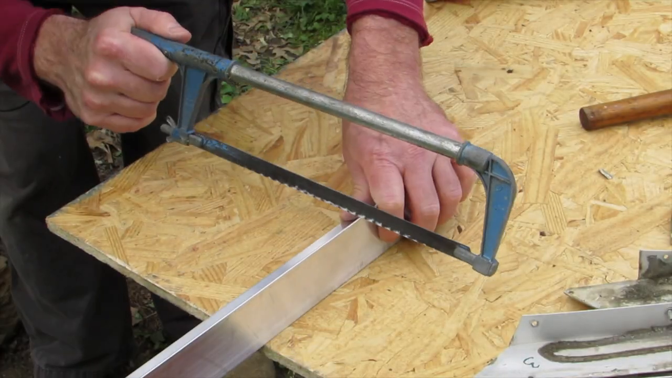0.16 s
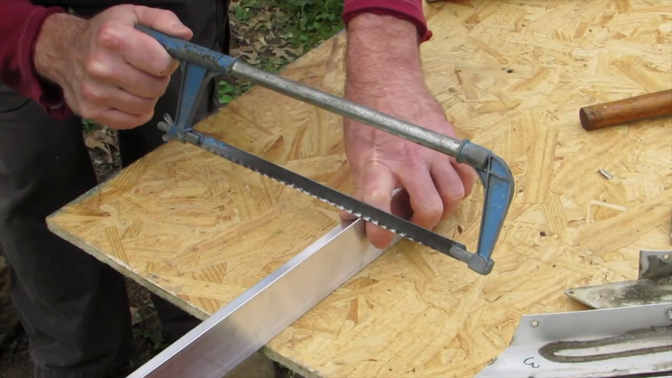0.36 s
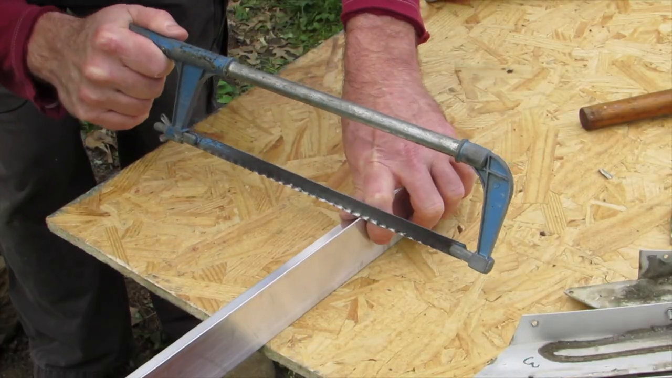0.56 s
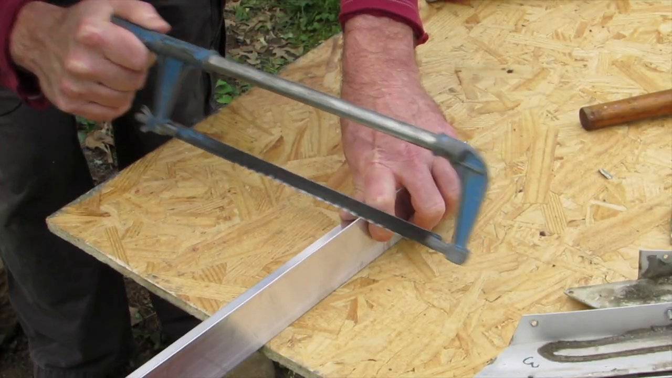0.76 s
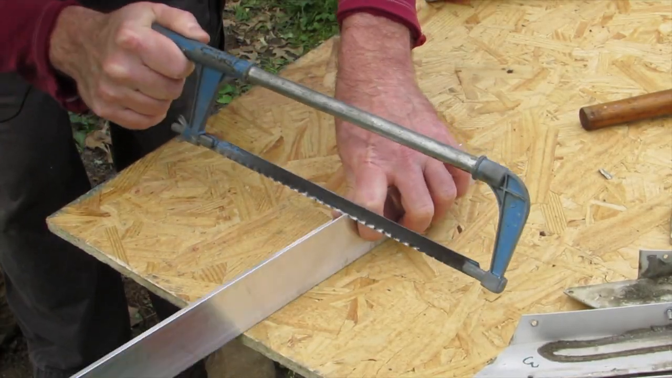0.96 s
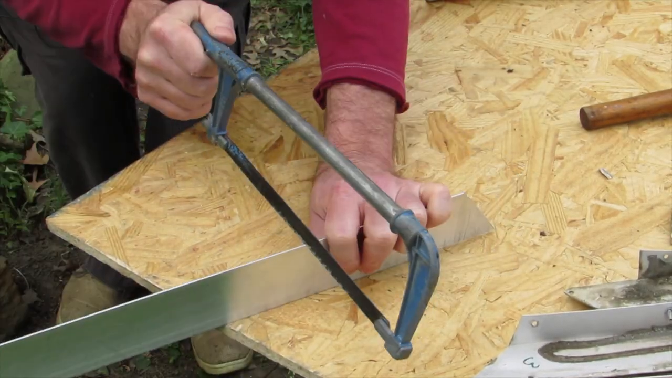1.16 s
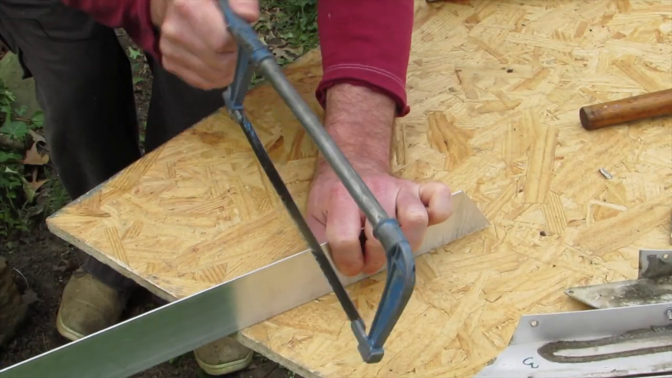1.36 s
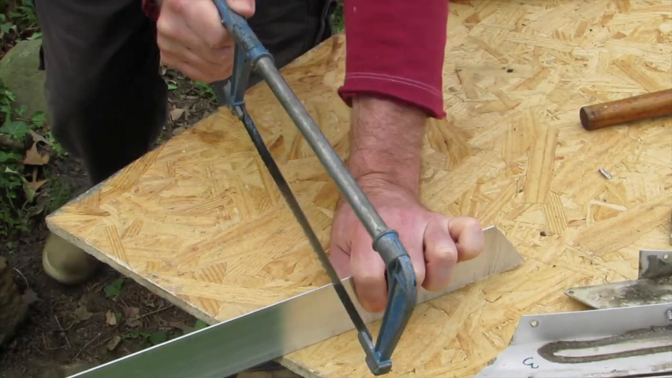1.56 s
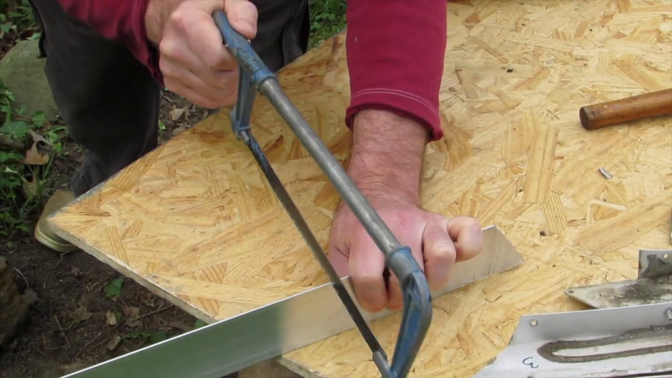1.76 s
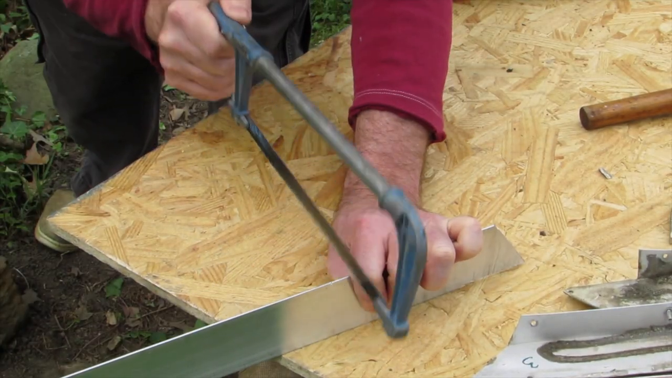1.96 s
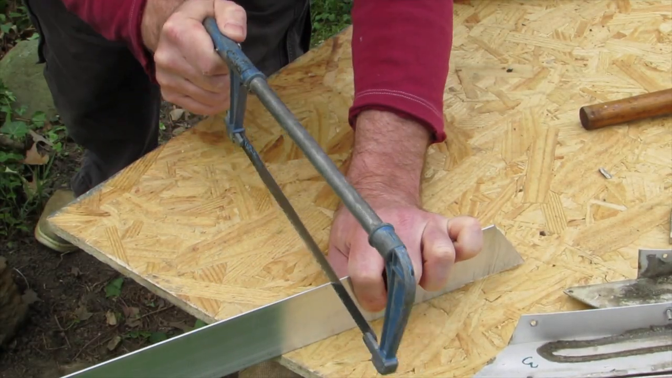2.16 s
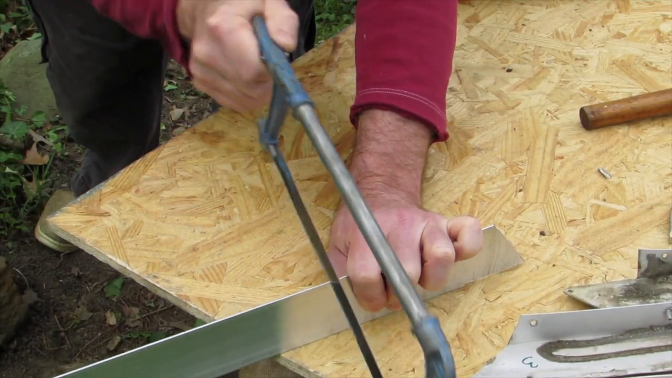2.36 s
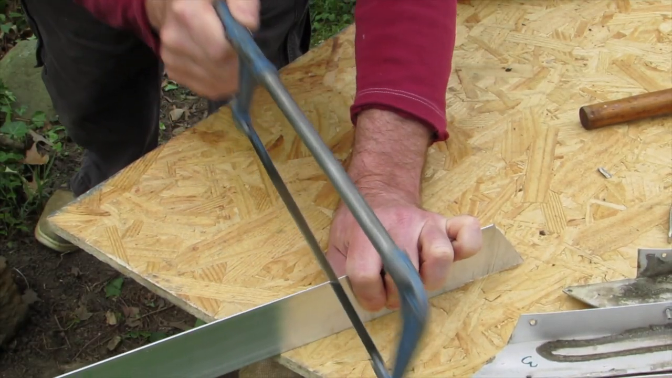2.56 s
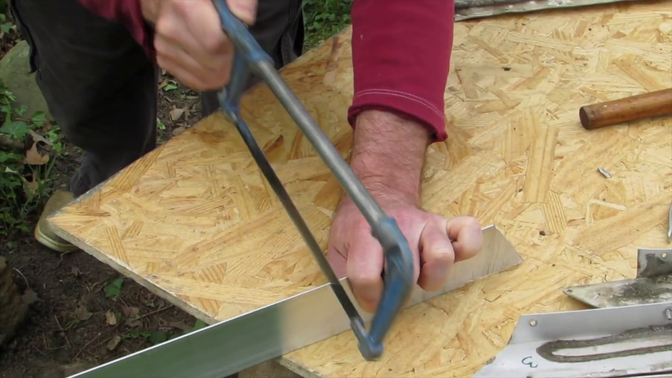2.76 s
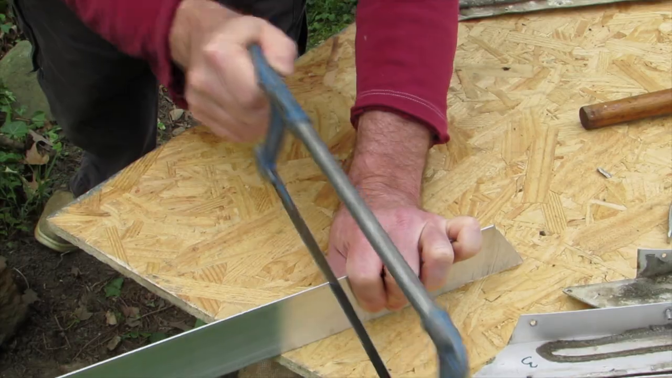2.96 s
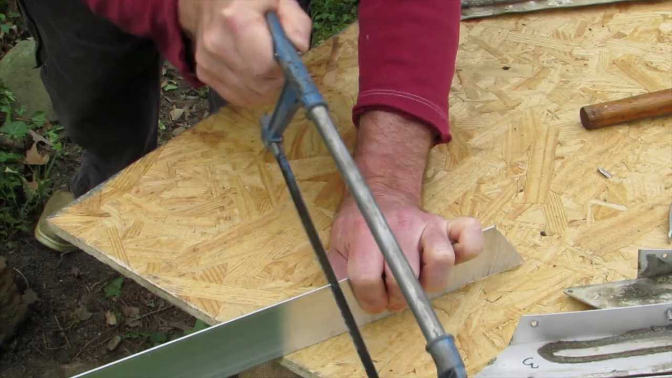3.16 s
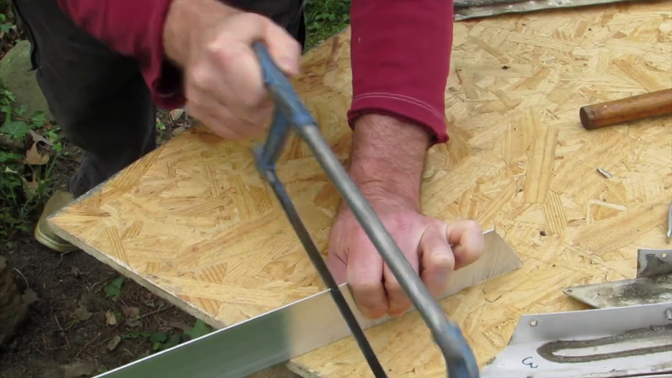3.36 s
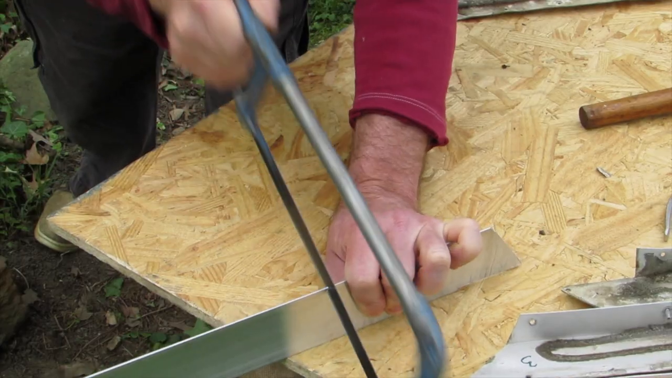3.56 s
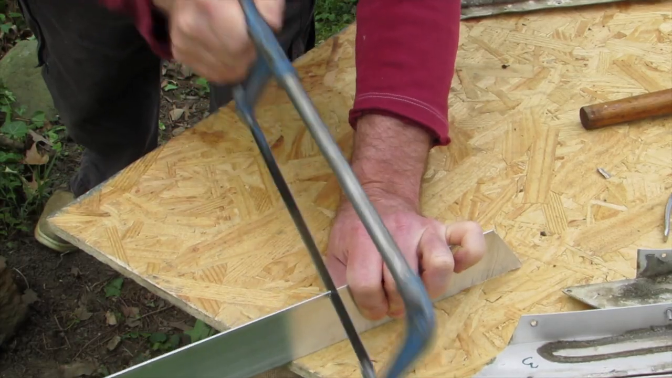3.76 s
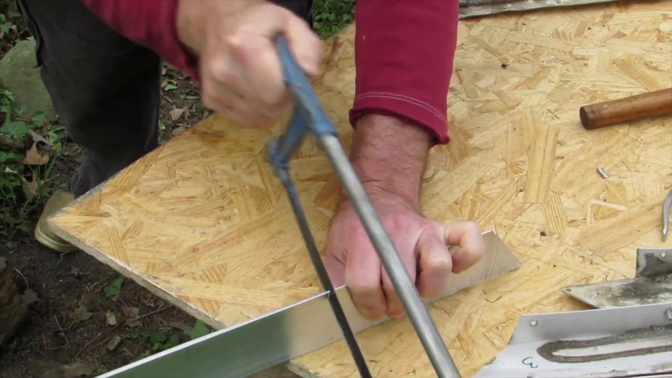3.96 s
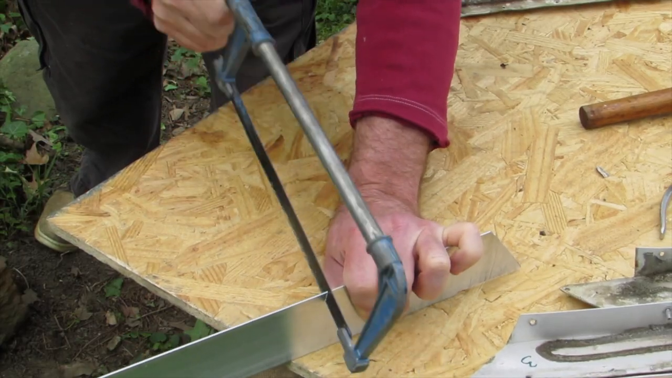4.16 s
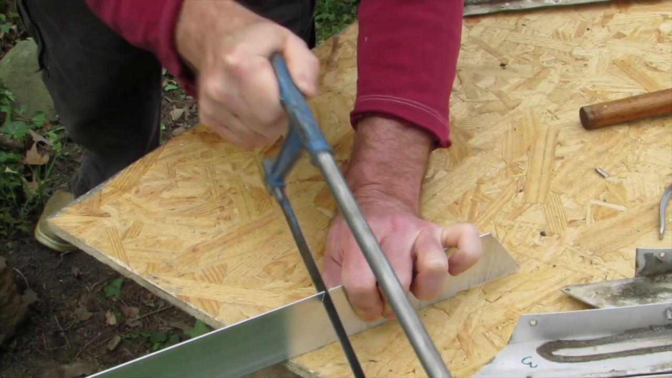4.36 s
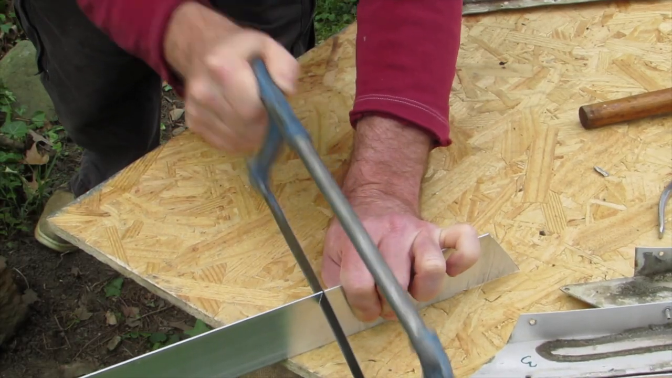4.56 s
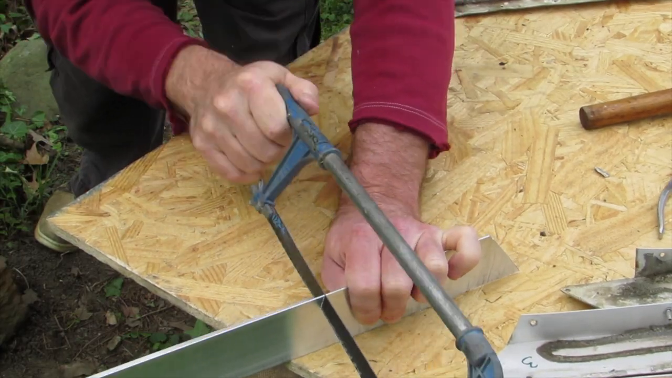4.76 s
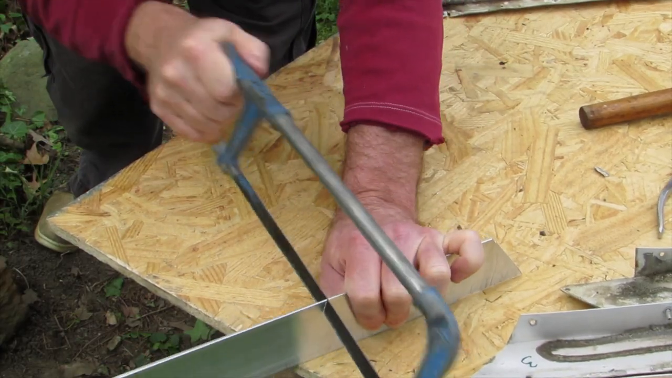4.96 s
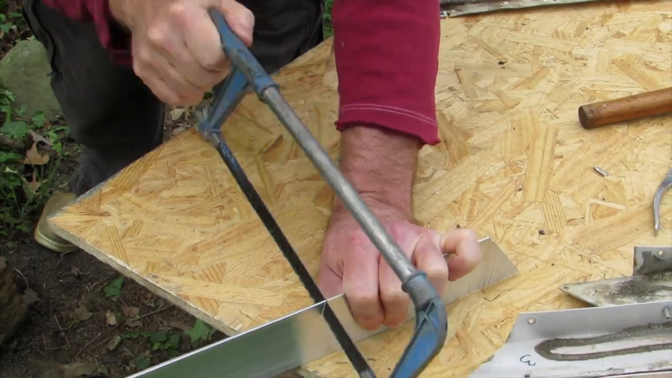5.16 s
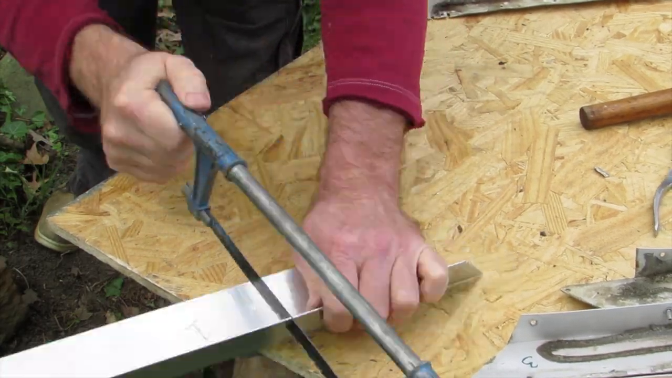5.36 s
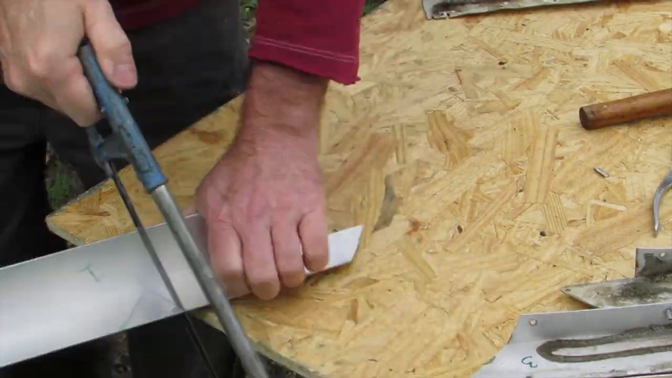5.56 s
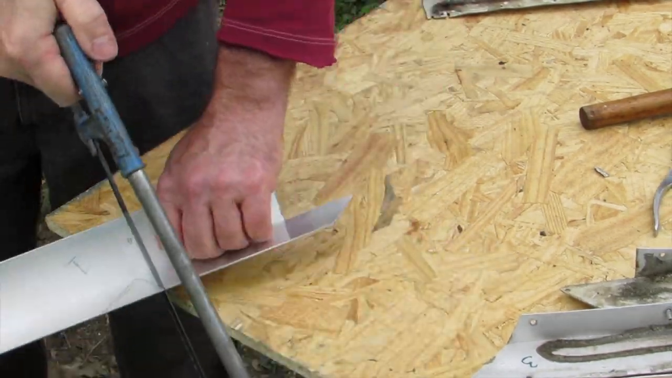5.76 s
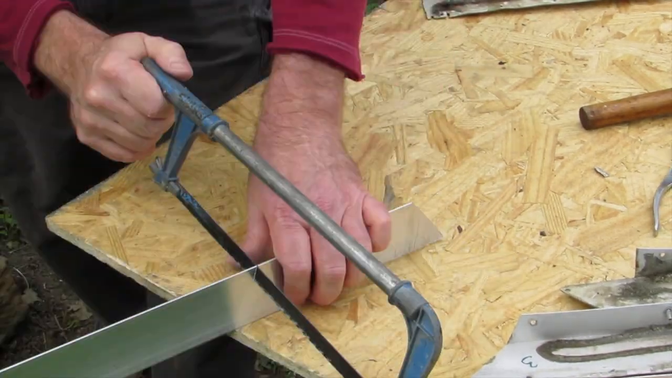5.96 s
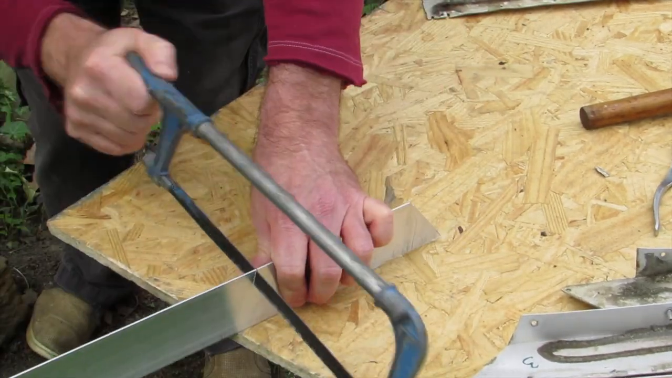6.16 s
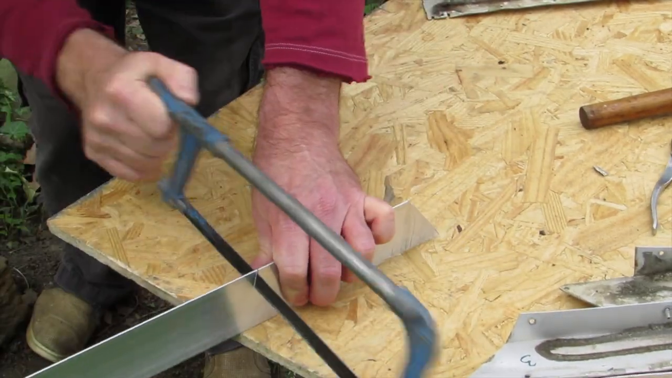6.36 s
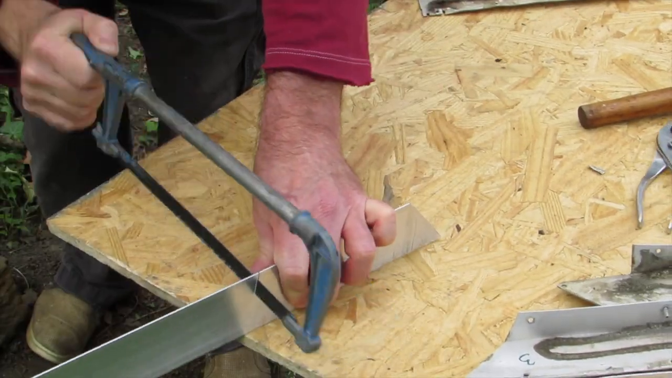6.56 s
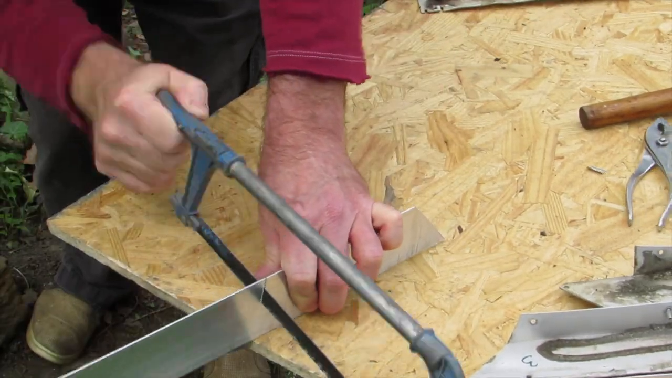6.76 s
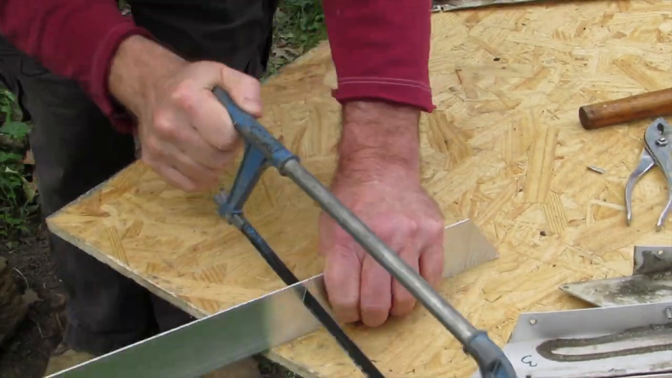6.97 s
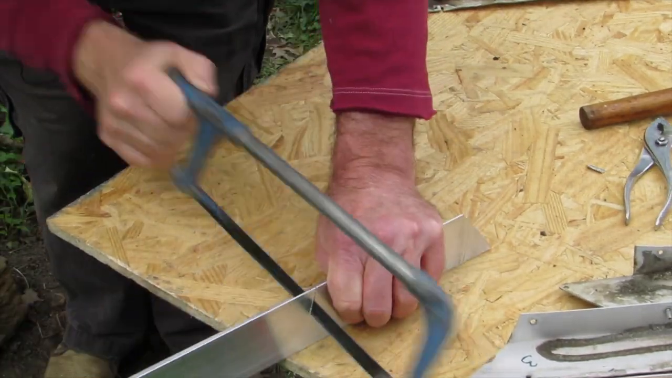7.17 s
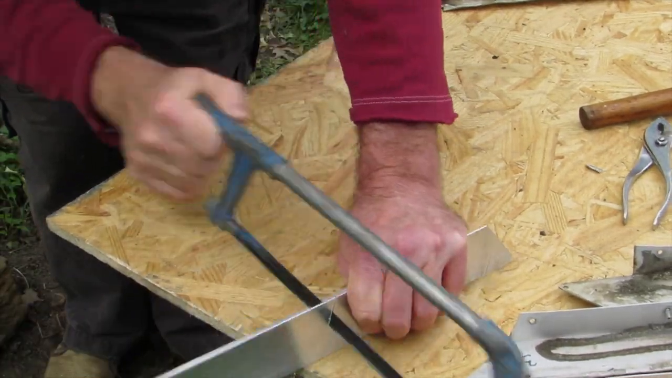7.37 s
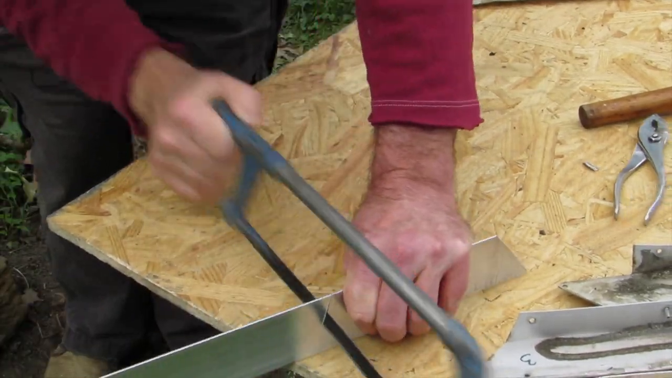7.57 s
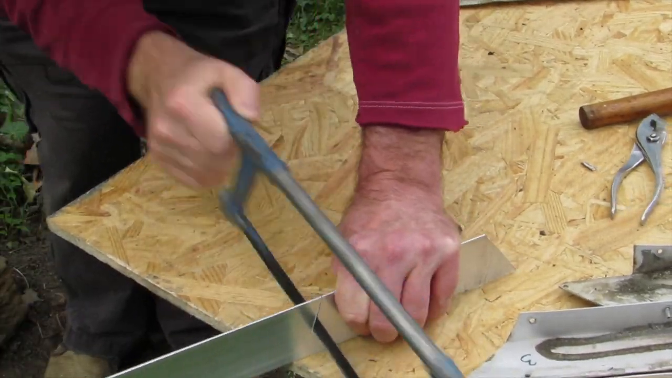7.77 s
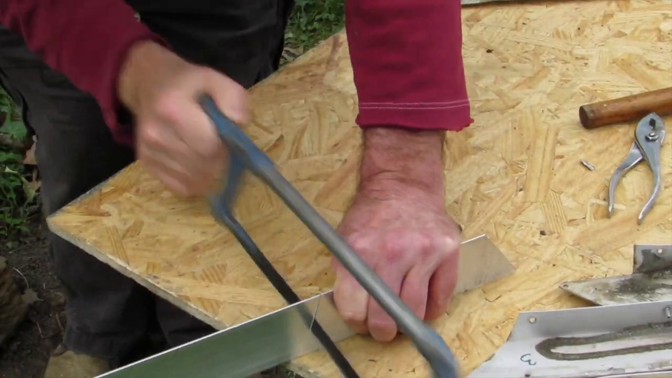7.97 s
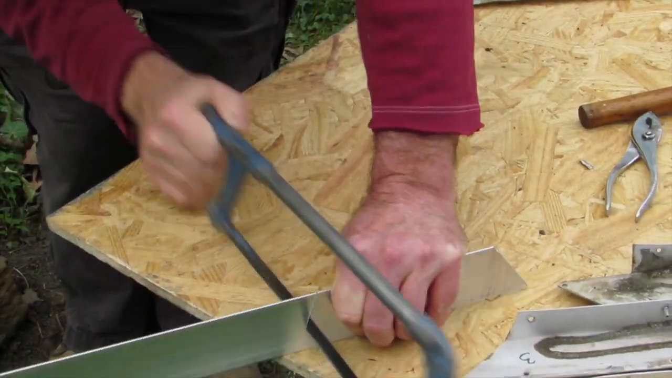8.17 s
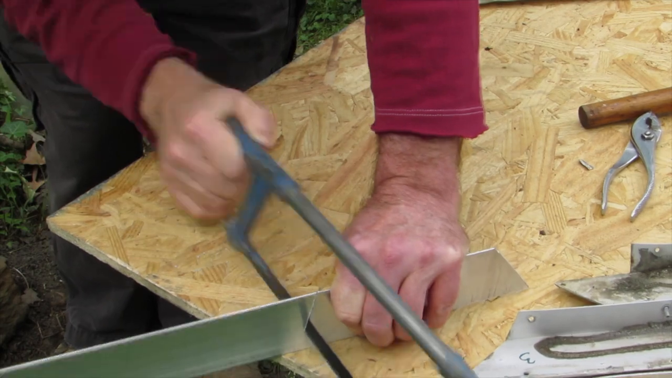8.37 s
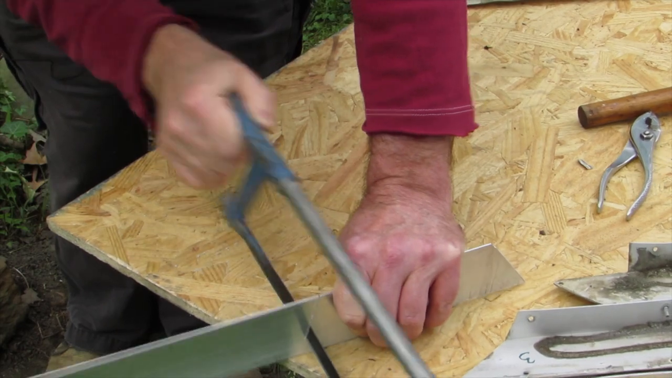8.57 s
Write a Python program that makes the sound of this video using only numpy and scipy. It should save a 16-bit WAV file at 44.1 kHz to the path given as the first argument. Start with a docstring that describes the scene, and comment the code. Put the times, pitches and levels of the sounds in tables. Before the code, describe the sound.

A hacksaw works thin aluminium trim on a chipboard bench outdoors, heard close and much faster than life. In the first 0.4 seconds only hiss, far traffic and faint woody scrapes and ticks; strokes begin softly at 0.45, with a brief distant drone near 0.6, and swell to a coarse rattle by 0.9. After a short break near 1.1, a sharp bite at 1.3 starts loud, irregular, bright strokes, faltering around 1.7 and 2.1. From 2.3 to 4.75 a steady gritty metallic flutter runs, about eighteen push-pull cycles a second, with low thumps. It hitches, then bursts again from 5.05 to 5.35. Until 6.1 the trim is turned: rubbing, small knocks, clearer hiss, a tiny high chirp near 5.85. Sawing returns at 6.1, keener and more ringing, with quick gaps near 6.95, 7.4, 7.75 and 8.1, and is still going at 8.6.

```python
"""A hacksaw cuts thin aluminium trim on a chipboard bench outdoors, heard at many times its real speed:
pushes and pulls rattle by, some forty a second, each one an arch of tooth tone and gritty noise
ringing the modes of metal and bench, with a low thump. Around the cuts the trim slides (rubbing noise);
knocks, and sharp bites opening a few strokes, are ticks with a short crack. Behind lie far traffic and
air hiss (shaped noise), a brief drone and thin whistles, perhaps birds (sines), and a little breeze (low noise)."""
import sys
import numpy as np
from scipy import signal
from scipy.fft import rfft, irfft
from scipy.io import wavfile
from scipy.ndimage import uniform_filter1d

SR = 44100
rng = np.random.default_rng(int(sys.argv[2]) if len(sys.argv) > 2 else 0)


def master(y):
    """Save y as 16-bit WAV."""
    cut = np.clip(np.atleast_2d(y).T, -1, 1)
    pcm = np.round(cut * 32767)  # scale
    wavfile.write(sys.argv[1], SR, pcm.astype(np.int16))


N = 379701   # length in samples

# All levels in the tables are relative: the mix sets the final balance.
# uneven strokes that start a cut, snag or trail off:
# (start [s], length [ms], level [dB], bench level over metal level [dB])
UNEVEN_STROKES = [(.207, 16, -49, 2), (.233, 20, -45, -0.5), (.257, 19, -51.5, 5),
                  (1.0141, 13.4, -49.5, -4), (1.0408, 25, -48, -7), (1.0797, 29, -42, -11),
                  (1.2, 12.3, -38.5, -3), (1.269, 11.4, -34.5, -12), (1.2897, 22.5, -24.5, -12),
                  (1.322, 14.2, -22, -16), (1.3414, 32, -27.5, -15.5), (1.3703, 13.6, -24, -14),
                  (1.3949, 23.7, -28, -12.5), (1.42, 16.5, -27.5, -15.5), (1.4457, 23.8, -36, -7.5),
                  (1.4997, 10.3, -40.5, -3), (1.5252, 12.8, -33, -4.5), (1.5952, 48, -41.5, -8.5),
                  (1.7398, 18, -42, -0.5), (1.7849, 21.4, -44, -12), (1.8111, 21.3, -29, -7.5),
                  (1.839, 31, -28.5, -8.5), (1.869, 20.7, -25.5, -18), (1.898, 30.3, -34, -13),
                  (1.9287, 20.8, -24.5, -15.5), (1.957, 27.3, -26, -13), (1.9905, 20, -26.5, -15),
                  (2.013, 18, -38.5, -6.5), (2.216, 26, -33.5, -8.5), (2.2415, 29.7, -29, -13),
                  (2.2676, 29.7, -28, -15), (3.2472, 22.6, -35, -11.5), (4.9709, 16.8, -35, -4),
                  (5.0346, 13, -32, -7), (6.0942, 22.4, -28, -12), (6.154, 15.6, -26.5, -9),
                  (6.1815, 14, -29.5, -1.5), (6.2013, 20, -28, -9), (6.2256, 19, -25.5, -15),
                  (6.252, 21.5, -25, -18.4), (7.0961, 24, -30.5, -13.5), (7.3202, 25, -38.5, -16),
                  (7.7603, 16.2, -35.5, -18), (8.1131, 13, -44, -4), (8.1589, 21, -32, -15)]
# bouts of steady sawing, one curve each, read at every push-pull cycle:
# (start of a push [s], cycle number, push [ms], pull [ms], push level [dB], pull level [dB], bench level [dB])
SAWING_BOUTS = [
    [(.4573, 0, 24.4, 17, -54, -51, -52.5), (.5488, 2, 23, 20, -46, -48.5, -50.5),
     (.6426, 4, 18, 23, -40, -38, -45), (.7445, 6, 23, 22, -34, -31, -41),
     (.8503, 8, 21.8, 24, -27.5, -28, -38.5), (.9606, 10, 19.2, 21, -26.5, -25.5, -42)],
    [(2.3, 0, 16.5, 27, -23, -37.5, -40.5), (2.4105, 2, 15.8, 27, -25, -34.5, -45),
     (2.5231, 4, 18, 24, -28, -35, -47.5), (2.6355, 6, 18, 23, -27, -34, -48),
     (2.795, 9, 20.8, 22, -28.5, -33.5, -49.5), (2.9564, 12, 18, 24, -28.5, -36, -50.5),
     (3.064, 14, 20, 30, -29.5, -42.5, -52.5), (3.2228, 17, 19.2, 25, -30.5, -39, -48.5)],
    [(3.3502, 0, 21.6, 24, -29, -38, -46), (3.4104, 1, 20, 23, -27.5, -29, -48.5),
     (3.523, 3, 17.1, 26, -29.5, -36, -50.5), (3.6935, 6, 16.7, 26, -31, -42.5, -53.5),
     (3.858, 9, 17.8, 25, -30.5, -39, -50), (4.0255, 12, 15.8, 24, -27.5, -34, -52),
     (4.196, 15, 18, 26, -32.5, -43.5, -52), (4.255, 16, 12, 23.8, -30.5, -40, -48.5),
     (4.31, 17, 18, 22, -32.5, -35.5, -53), (4.4673, 20, 18, 21, -29, -32, -48),
     (4.7156, 25, 16.7, 19, -28.5, -37, -49.5)],
    [(5.063, 0, 15.03, 16.6, -30.5, -27, -41.5), (5.1041, 1, 15.9, 18, -24, -34.5, -45),
     (5.2001, 3, 11.6, 19, -26.5, -34, -44.5), (5.2991, 5, 16.6, 23, -30, -35, -47)],
    [(6.2754, 0, 17.6, 22, -25.5, -36, -48), (6.3727, 2, 14.4, 20, -26, -31, -49),
     (6.51, 5, 15.8, 20, -27.5, -34, -49), (6.6493, 8, 17.1, 19, -25, -32.5, -46.5),
     (6.8267, 12, 17, 20, -26.5, -34.5, -47.5)],
    [(7.124, 0, 19.7, 18, -27.5, -34.5, -48), (7.1702, 1, 16.5, 18, -29, -31, -50),
     (7.3001, 4, 17.7, 21, -28.5, -35.5, -51.5)],
    [(7.4211, 0, 19.5, 16, -32.5, -31, -51), (7.504, 2, 18.2, 16, -32, -34, -55.5),
     (7.6238, 5, 13, 18, -32.5, -38.5, -54), (7.6972, 7, 14.8, 17, -29.5, -32, -55)],
    [(7.7846, 0, 15.2, 16.5, -28.5, -36, -53.5), (7.8611, 2, 17.4, 17.5, -32, -34, -55),
     (7.9804, 5, 19.8, 18, -33, -41.5, -51.5), (8.094, 8, 15.7, 17, -29.5, -32, -58)],
    [(8.1816, 0, 21, 19.5, -32.5, -39, -51), (8.263, 2, 15.9, 17, -29.5, -33, -51),
     (8.3834, 5, 17.6, 17, -36, -29, -50), (8.5066, 8, 14.5, 22, -32, -39.5, -50.5),
     (8.5842, 10, 22, 23, -32, -37, -55.5)],
]
# how the cut changes: (time [s], depth of cut [0-2], reach = top tooth rate x stroke length [teeth],
# treble level [dB], thump level [dB])
CUT_PROGRESS = [(0, 0.15, 115, -6, -3), (.55, 0.13, 117, 3.5, 8), (.9, 0.38, 146, 2.5, -8.5),
                (1.4, 0.55, 132, 2.5, -9), (2.1, 0.74, 140, 3, -6), (2.6, 0.94, 130, -3, -6),
                (3.3, 1, 133.4, -1.5, -3.5), (4.1, 1.03, 136, -0.5, 1), (4.7, 1.17, 138, 0, -9.5),
                (5.2, 0.75, 102.6, 0.5, -11), (6.22, 0.5, 78, 1.5, -8.5), (6.3, 1.1, 145, 4.5, -10.5),
                (6.8, 1.88, 153, .5, -8), (7.3, 1.56, 146, -1, -4), (7.8, 2.03, 149, -4.5, 0.5),
                (8.61, 2, 175, -3, -1.5)]
# trim sliding on the bench: (start [s], length [ms], level [dB], bench level over metal level [dB])
TRIM_SLIDES = [(.41, 45, -61, -5), (1.14, 45, -56, -15), (1.216, 40, -53, -4), (2.07, 26, -63, -1),
               (2.1, 69, -57.5, -9), (3.295, 21, -57, -13), (5.33, 30, -61, -5), (5.374, 37, -53.5, -9.5),
               (5.5, 20, -57, -3), (5.512, 63, -54, 2.5), (5.61, 68, -57, -3), (5.9, 43, -47.5, 4),
               (6.87, 54, -62, -6.5), (6.987, 18, -58.5, -10), (7.345, 40, -55, -5.5), (7.72, 15, -56, -8),
               (8.133, 18, -58, -7)]
# knocks of trim and blade, and sharp bites opening a few saw strokes:
# (time [s], level [dB], bench level over metal level [dB])
KNOCKS_AND_BITES = [(0.3053, -35, -8), (0.3382, -40, -5), (1.2912, -17.5, -15), (1.8151, -30, -3),
                    (2.0612, -28.5, -11), (2.1913, -32, -15.5), (4.803, -44, 6), (4.975, -26.5, -32.5),
                    (5.013, -36, -5), (5.5915, -39, -1.5), (5.6697, -29.5, -39), (5.789, -50, 5),
                    (5.904, -41, -13), (5.9244, -30.5, -4), (5.9526, -25, -4), (5.996, -42.5, -4),
                    (6.0528, -44, -12), (6.1415, -31, -11), (6.9659, -64, -12), (7.416, -40, -3),
                    (7.7173, -36, -18)]
# modes of trim, blade and frame:
# (frequency [Hz], width [Hz], level in a shallow [dB], a middling [dB] and a deep cut [dB])
METAL_MODES = [(3306, 354, 2, -13, -2), (3748, 99, -7, -8, -14.5), (4660, 195, -6.5, -8, -3),
               (5426, 185, -8, 2, 3), (6025, 187, -8.5, -5, -4), (6878, 320, -6.5, -2, 3),
               (7310, 310, -2, -3.5, -33), (7950, 980, -11, -0.5, -13), (9010, 670, -11, -3, 1.5),
               (10020, 1320, -7, -6.5, -2), (11800, 1400, -13.5, -5, -2.5), (12560, 890, -5, -5.5, -1),
               (14230, 380, -17.5, -2.5, 1), (15570, 1310, -19, -7, 4)]
# modes of the bench top:
# (frequency [Hz], width [Hz], level in a shallow [dB], a middling [dB] and a deep cut [dB])
BENCH_MODES = [(660, 170, -6, -17.5, -35.5), (824, 72, -2, -11, -17.5), (986, 79, 11, -7, -12),
               (1290, 640, -2, -8.5, -11), (1853, 104, 3.5, -1, -3.5), (2070, 110, -2.5, -5.5, -8.5),
               (2640, 220, -6.5, -7.5, -15)]
# shared level of traffic and hiss: (time [s], level [dB])
BACKGROUND_LEVEL = [(0, -59), (.45, -58), (1.0, -63), (1.25, -58.5), (2.15, -59.5), (2.45, -67.5),
                    (3.3, -74), (4.75, -75.5), (4.95, -71.5), (5.36, -69.5), (5.5, -66), (5.7, -60.5),
                    (6.0, -55), (6.3, -66), (6.9, -79.5), (7.08, -70.5), (7.4, -72.5), (8.61, -70)]
# colour of the far traffic: (frequency [Hz], spectral level [dB])
TRAFFIC_SPECTRUM = [(30, -56), (110, -24.5), (230, -16), (450, -10.5), (700, -6), (1300, -13.5),
                    (2500, -55), (5000, -20)]
# colour of the air hiss: (frequency [Hz], spectral level [dB])
HISS_SPECTRUM = [(80, -79.5), (500, -28), (1500, 4.5), (4000, 6), (8000, 0), (12000, -5.5), (14500, -17),
                 (15500, 6.5)]
# a far drone, perhaps an engine: (time [s], level [dB])
DRONE_LEVEL = [(0, -69), (.1, -70), (.28, -58.5), (.4, -69), (.54, -68), (.62, -53.5), (.72, -65),
               (.8, -95)]
# thin whistles, perhaps birds: (start [s], length [s], from pitch [Hz], to pitch [Hz], level [dB])
BIRD_WHISTLES = [(.04, .1, 8300, 8270, -68), (.38, .07, 8300, 8300, -68), (1.15, .06, 8350, 8300, -68),
                 (5.83, .08, 2900, 3600, -64), (5.855, .09, 9950, 10800, -55), (7.33, .07, 8300, 8300, -70)]
# a light breeze on the microphone ports: (time [s], level [dB])
BREEZE_LEVEL = [(0, -92), (.28, -88), (.4, -67), (.9, -81), (1.05, -80), (1.4, -76), (1.8, -74),
                (1.87, -62), (1.92, -92), (2.4, -100), (8.61, -100)]

UNEVEN_DB, UNEVEN_REACH = 1.2, .12   # stroke-to-stroke chance in level [dB] and in reach [share]
TOOTH_TONE_DB = 1.0   # tooth tone against grit
CATCH_DB, CATCH_SPREAD_DB = 3.5, 5.5   # catch of the teeth: level over its stroke, and spread of chance
THUMP_SHARPNESS = 1.282   # exponent: the thump grows faster than the pressure
REGRIP_S = 5.5   # the trim is turned and held down harder
REGRIP_DEPTH = 0.84   # from then on the bench mode levels follow at least this depth of cut
HISS_OVER_TRAFFIC_DB = 5
DRONE_HZ, DRONE_WAVER = 299, .02   # lower line, and wavering as a share of the pitch
CUTOFF_HZ = 15780


def strokes():
    """All strokes in order; in a bout the time left by push and pull is shared by both turns, ending on a push."""
    rows = list(UNEVEN_STROKES)
    for bout in SAWING_BOUTS:
        s, cycle, *columns = np.transpose(bout)
        every_cycle = np.arange(round(cycle[-1]) + 1)
        s, push_ms, pull_ms, push_db, pull_db, bench_db = (
            np.interp(every_cycle, np.round(cycle), c) for c in [s] + columns)
        push_db = push_db + UNEVEN_DB * rng.standard_normal(len(s))
        pull_db = pull_db + UNEVEN_DB * rng.standard_normal(len(s))
        pull_s = (s[:-1] + s[1:] + (push_ms - pull_ms)[:-1] / 1000) / 2
        rows += list(zip(s, push_ms, push_db, bench_db - push_db))
        rows += list(zip(pull_s, pull_ms, pull_db, bench_db - pull_db))   # drops the pull after the last push
    return sorted(rows)


def gestures(rows, steep, spill):
    """Pressure on metal and bench, swelling fast, dying slower and spilling past its ends; blade speed 0-1."""
    metal, bench, speed = np.zeros(N), np.zeros(N), np.zeros(N)
    for s, ms, db, share_db in rows:
        a, n = round(s * SR), round(ms / 1000 * SR)
        extra = round(spill * n)
        at = np.arange(max(a - extra, 0), min(a + n + extra, N))
        u = (at - a) / n   # place in the gesture, 0-1
        swell = np.exp(-np.abs((u - .45) / np.where(u < .45, .33, .4)) ** steep)
        metal[at] += from_db(db) * swell
        bench[at] += from_db(db + share_db) * swell
        speed[a:a + n] = np.sin(np.pi * (.12 + 0.88 * np.arange(n)[:N - a] / n))
    return metal, bench, speed


def teeth(rows, speed, reach):
    """One bite per tooth: the pitch follows blade speed, higher for quicker and longer-reaching strokes."""
    strokes_per_s = np.zeros(N)
    for (s, ms, *_), chance in zip(rows, rng.standard_normal(len(rows))):
        strokes_per_s[round(s * SR):] = (1 + UNEVEN_REACH * chance) / (ms / 1000)
    tooth_hz = reach * strokes_per_s * speed * (1 + 0.077 * wobble(1182.3))
    phase = 2 * np.pi * np.cumsum(tooth_hz) / SR
    tone = np.sin(phase) + 0.8 * np.sin(2 * phase)
    return tone * from_db(2.6 * wobble(360))


def grit(snag_db, burr_db):
    """Chips tearing: noise whose strength jumps from snag to snag, with lone sharp burrs; rms 1."""
    burrs = (rng.random(N) < 400 / SR) * rng.standard_normal(N) * from_db(burr_db)   # some 400 a second
    strength = from_db(snag_db * wobble(700) + 2.5 * wobble(130))
    return rms_one(rng.standard_normal(N) * strength + burrs)


def catches(rows):
    """In every stroke the teeth catch once with a crack, harder or softer, somewhere in the first half."""
    out, t = np.zeros(N + 400), np.arange(400) / SR
    for (s, ms, db, _), (place, chance) in zip(rows, rng.random((len(rows), 2))):
        a = round((s + ms / 1000 * (.15 + .35 * place)) * SR)
        level_db = db + CATCH_DB + CATCH_SPREAD_DB * np.log(chance + .01)
        out[a:a + 400] += from_db(level_db) * rng.standard_normal(400) * np.exp(-t / 0.0018)
    return out[:N]


def knocks_and_bites():
    """A sharp tick and a short crack of noise each, as forces on metal and on bench."""
    metal, bench, t = np.zeros(N), np.zeros(N), np.arange(400) / SR
    for s, db, share_db in KNOCKS_AND_BITES:
        a = round(s * SR)
        crack = rng.standard_normal(400) * np.exp(-t / 0.0017)
        crack[0] = 2.7   # the tick
        metal[a:a + 400] += from_db(db) * crack
        bench[a:a + 400] += from_db(db + share_db) * crack
    return metal, bench


def resonate(x, hz, width_hz):
    """Two-pole resonance with gain 1 on top."""
    r = np.exp(-np.pi * width_hz / SR)
    feedback = [1, -2 * r * np.cos(2 * np.pi * hz / SR), r * r]
    return signal.lfilter((1 - r * r) / 2 * np.array([1, 0, -1]), feedback, x)


def body(force, rasp, modes, depth, vary_db, between_db, low_hz):
    """Parallel modes, driven unevenly as the contact moves, over the broad contact rasp; unit gain for noise."""
    out = from_db(between_db) * filtered(rasp, 2, low_hz, "high")
    power = from_db(2 * between_db)
    for k, (hz, width_hz, *dbs) in enumerate(modes):
        gain = from_db(np.interp(depth, [0, 1, 2], dbs))
        drive = force * gain * from_db(vary_db * wobble(40))
        out += (-1) ** k * resonate(drive, hz, width_hz)   # alternating signs
        power = power + gain ** 2 * np.pi * width_hz / SR
    return out / np.sqrt(power)


def metal_ring(saw, bite, slide, rub, crack, depth, bright_db):
    """Trim, blade and frame ring under sawing, sliding and cracks; the treble level moves with the cut."""
    force = from_db(-2) * saw * (grit(snag_db=2, burr_db=19.5) + bite) + slide * rub + crack
    rasp = from_db(4.5) * saw * (grit(snag_db=2.5, burr_db=22.0) + bite) + slide * rub + from_db(6.5) * crack
    metal = body(force, rasp, METAL_MODES, depth, vary_db=1.5, between_db=-17, low_hz=4800)
    treble = filtered(metal, 4, 11000, "high")
    return metal + (from_db(bright_db) - 1) * treble


def bench_ring(saw_bench, handling, depth):
    """Sawing pressure shakes noise out of the bench modes; slides and cracks add a dry, broad scuff."""
    # the heavy board follows sluggishly: pressure averaged over 17 ms and a little late
    sluggish = uniform_filter1d(saw_bench, round(0.017 * SR), origin=100)
    push = from_db(1) * sluggish * rng.standard_normal(N)
    held = np.where(np.arange(N) < REGRIP_S * SR, depth, np.maximum(depth, REGRIP_DEPTH))
    scuff = filtered(handling, 2, [900, 2900], "band")
    force = push + from_db(-11.5) * handling
    ring = body(force, push, BENCH_MODES, held, vary_db=3.0, between_db=-20, low_hz=496)
    return from_db(10.5) * scuff + ring


def thump(saw, thump_db):
    """Each stroke shakes the bench: a short low thump of noise, mostly alike in both ears."""
    shake = saw ** THUMP_SHARPNESS * from_db(thump_db + 3.5 * wobble(60)) * rng.standard_normal((2, N))
    alike, opposite = filtered(shake, 1, [20, 450], "band")
    return from_db(-11.5) * alike + from_db(-24) * opposite * [[1], [-1]]


def bench_work():
    """Saw, slides, knocks and bites share the modes of metal and bench; the bench sounds more on the right."""
    depth, reach, bright_db, thump_db = in_time(CUT_PROGRESS)
    rows = strokes()
    saw, saw_bench, speed = gestures(rows, steep=1.86, spill=0.64)
    slide, slide_bench, _ = gestures(TRIM_SLIDES, steep=6.9, spill=0.12)
    crack, crack_bench = knocks_and_bites()
    crack = crack + catches(rows)
    rub = grit(snag_db=2.5, burr_db=5)
    bite = from_db(TOOTH_TONE_DB) * teeth(rows, speed, reach)
    metal = metal_ring(saw, bite, slide, rub, crack, depth, bright_db)
    bench = bench_ring(saw_bench, slide_bench * rub + crack_bench, depth)
    return metal * from_db([[-.4], [.4]]) + bench * from_db([[-3.2], [2.4]]) + thump(saw, thump_db)


def yard(x, decay_s, wet_db, dull_hz):
    """A short scatter of dull echoes, other ones for each ear."""
    t = np.arange(round(.07 * SR)) / SR
    tail = rng.standard_normal((2, len(t))) * np.exp(-t / decay_s)
    tail = signal.lfilter(*signal.butter(1, dull_hz, fs=SR), tail)
    tail = tail / np.sqrt(np.sum(tail ** 2) / 2)
    return from_db(wet_db) * signal.fftconvolve(x, tail, axes=1)[:, :N]


def whistles():
    """Thin gliding sines with a slight flutter of pitch, alike in both ears."""
    out = np.zeros(N)
    for s, length, from_hz, to_hz, db in BIRD_WHISTLES:
        a, n = round(s * SR), round(length * SR)
        hz = np.linspace(from_hz, to_hz, n) * (1 + 0.0065 * wobble(400)[:n])
        tone = np.sin(2 * np.pi * np.cumsum(hz) / SR)
        out[a:a + n] += from_db(db) * np.hanning(n) ** .5 * tone
    return out


def drone():
    """Two wavering lines an octave apart, the upper one stronger."""
    level_db, = in_time(DRONE_LEVEL)
    phase = 2 * np.pi * np.cumsum(DRONE_HZ * (1 + DRONE_WAVER * wobble(16.6))) / SR
    return from_db(level_db) * (0.41 * np.sin(phase) + np.sin(2 * phase))


def traffic_and_hiss():
    """Shaped noise under one level curve: traffic mostly alike in both ears, stronger right; hiss unlike."""
    level_db, = in_time(BACKGROUND_LEVEL)
    traffic = coloured(TRAFFIC_SPECTRUM) * from_db([[-2.5], [2.5]])
    traffic = traffic + 0.26 * coloured(TRAFFIC_SPECTRUM) * [[1], [-1]]
    hiss = np.array([coloured(HISS_SPECTRUM), coloured(HISS_SPECTRUM)])
    return from_db(level_db) * traffic + from_db(level_db + HISS_OVER_TRAFFIC_DB) * hiss


def breeze():
    """Lumpy low noise on the microphone ports, opposite in the two ears."""
    level_db, = in_time(BREEZE_LEVEL)
    low = rms_one(filtered(rng.standard_normal(N), 2, [70, 320], "band"))
    return from_db(level_db + 4.0 * wobble(20)) * low * np.array([[1], [-1]])


def from_db(db):
    """Gain of a level."""
    return 10 ** (np.asarray(db) / 20)


def rms_one(x):
    """Scaled to unit rms."""
    return x / np.sqrt(np.mean(x ** 2) + 1e-20)


def filtered(x, order, hz, kind):
    """Butterworth filter."""
    return signal.sosfilt(signal.butter(order, hz, kind, fs=SR, output="sos"), x)


def in_time(rows):
    """Columns of a curve, per sample."""
    s, *columns = np.transpose(rows)
    return [np.interp(np.arange(N) / SR, s, c) for c in columns]


def coloured(spectrum):
    """Noise of the given spectrum, joined up along log frequency; rms 1."""
    hz = np.maximum(np.fft.rfftfreq(N, 1 / SR), 1)
    at, db = np.transpose(spectrum)
    gain = from_db(np.interp(np.log(hz), np.log(at), db))
    return rms_one(irfft(rfft(rng.standard_normal(N)) * gain, N))


def wobble(rate_hz):
    """Random wandering, noise kept below the given rate; rms 1."""
    return rms_one(filtered(rng.standard_normal(N), 2, rate_hz, "low"))


def scene():
    """Bench work with its echoes, over the outdoor background."""
    work = bench_work()
    echoes = yard(work, decay_s=0.014, wet_db=-19.0, dull_hz=8000)
    return work + echoes + whistles() + drone() + traffic_and_hiss() + breeze()


def record(dry):
    """The top is cut steeply by an elliptic low-pass."""
    return signal.sosfilt(signal.ellip(12, .5, 65, CUTOFF_HZ, fs=SR, output="sos"), dry)


dry = scene()
out = record(dry)
master(out)
```